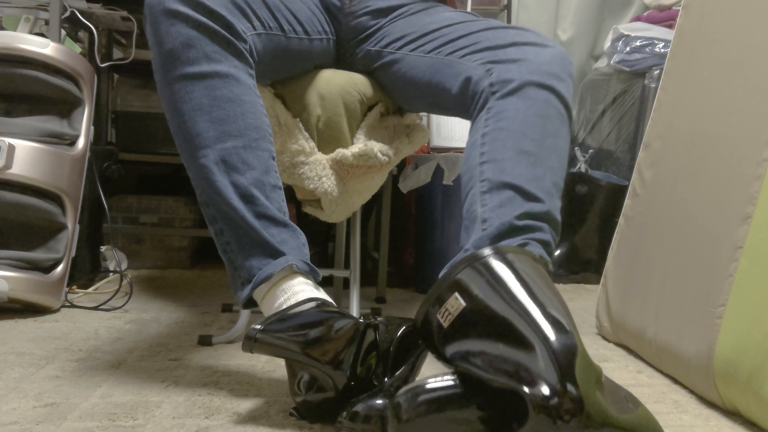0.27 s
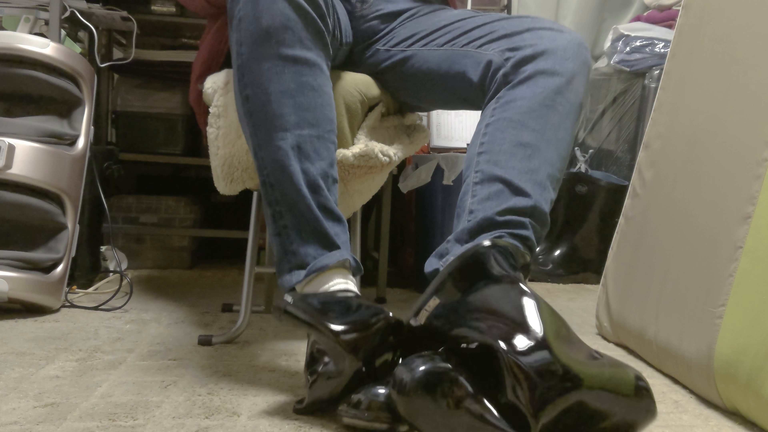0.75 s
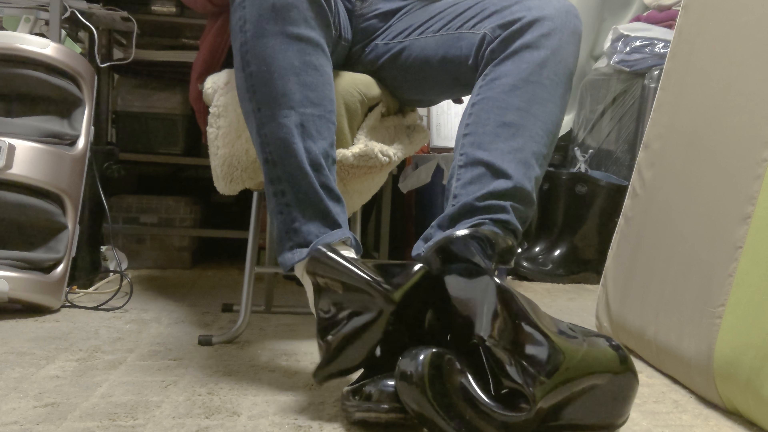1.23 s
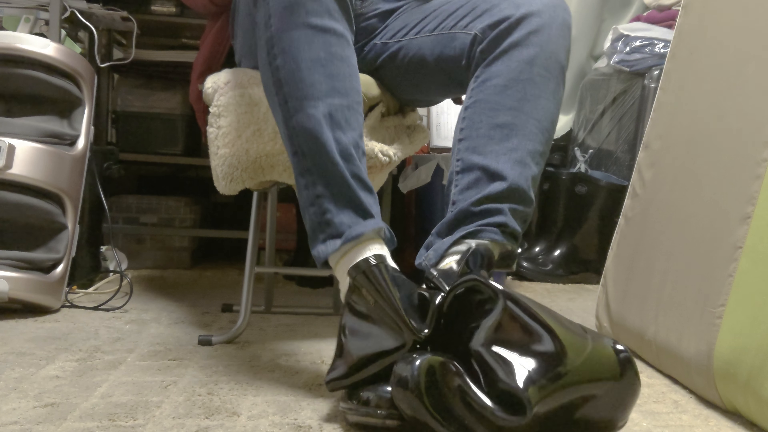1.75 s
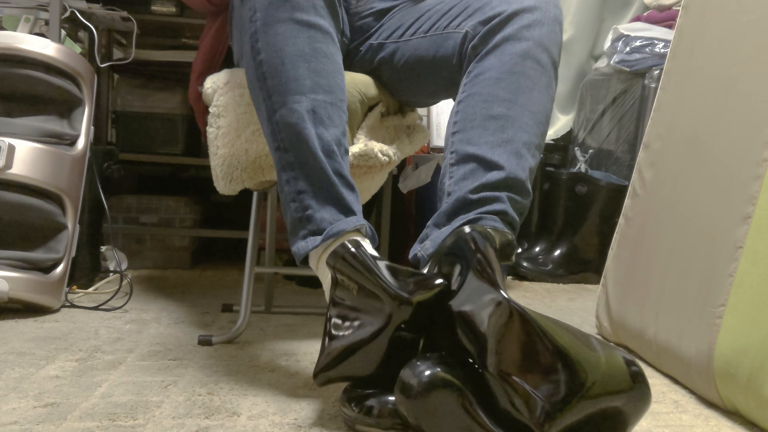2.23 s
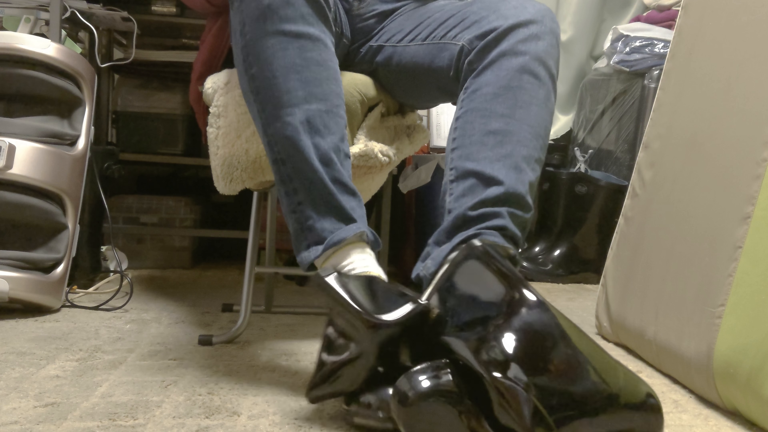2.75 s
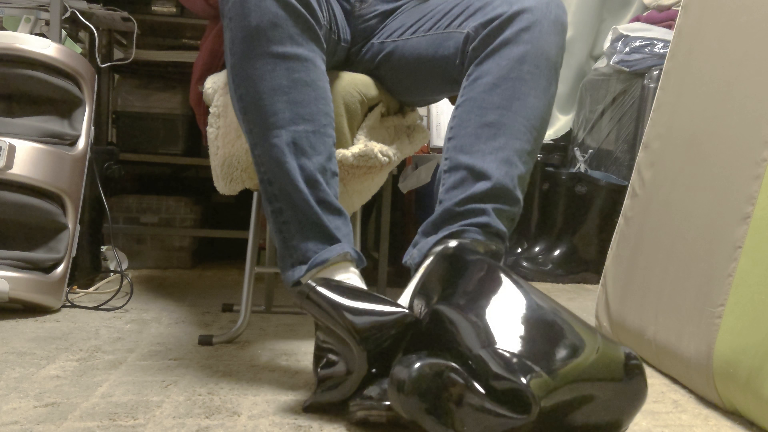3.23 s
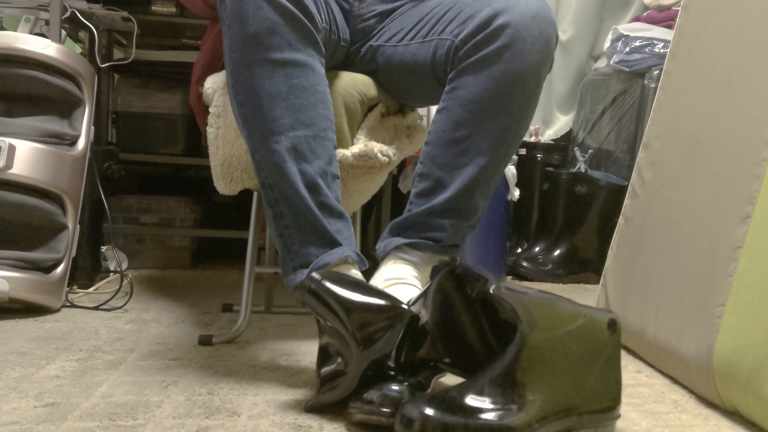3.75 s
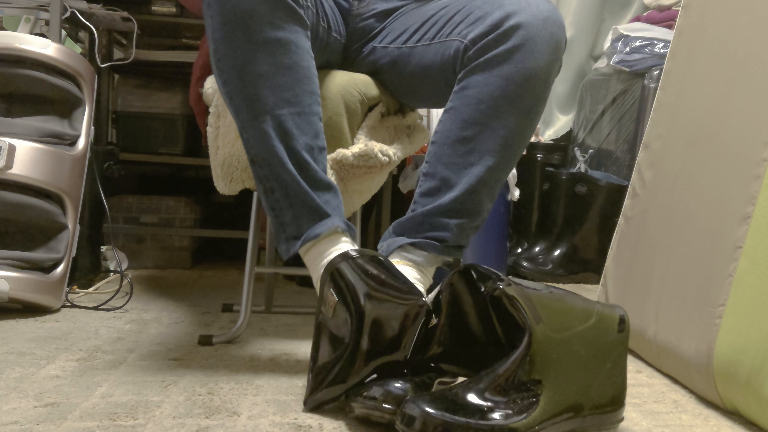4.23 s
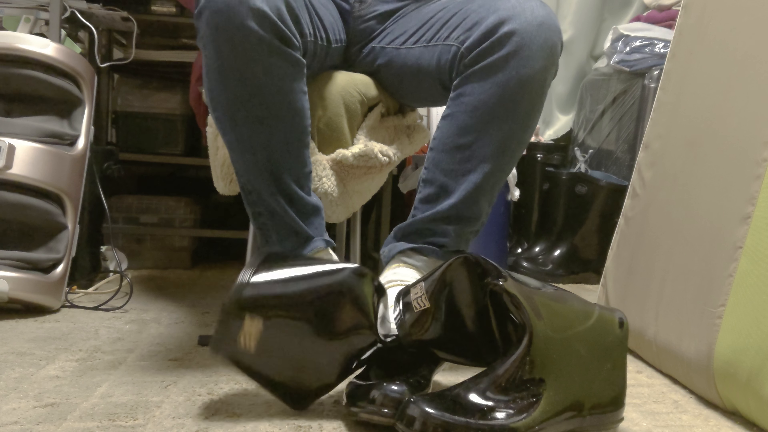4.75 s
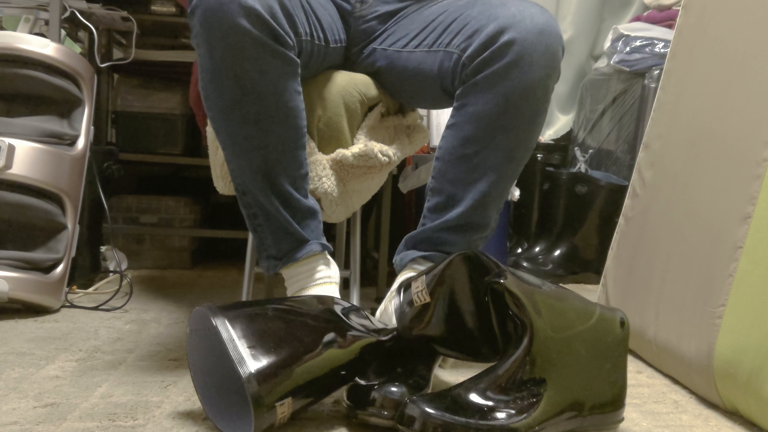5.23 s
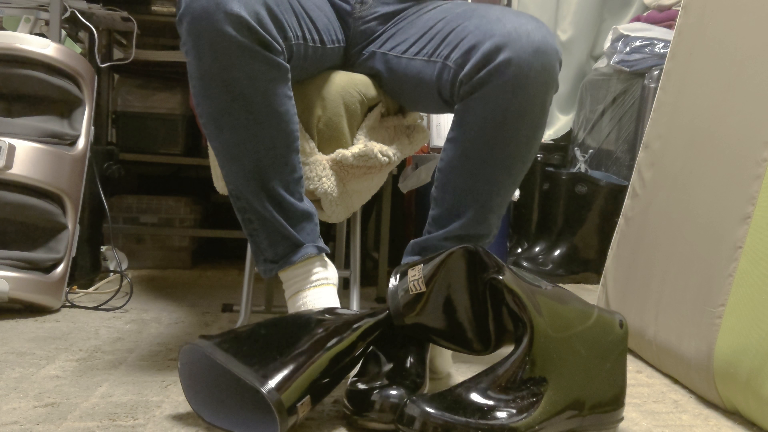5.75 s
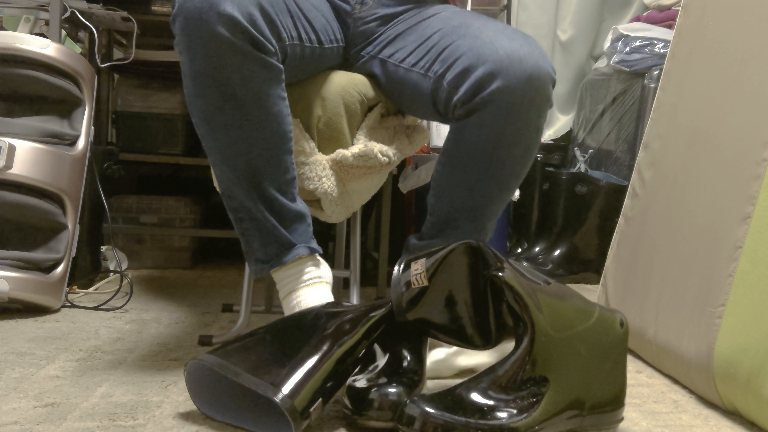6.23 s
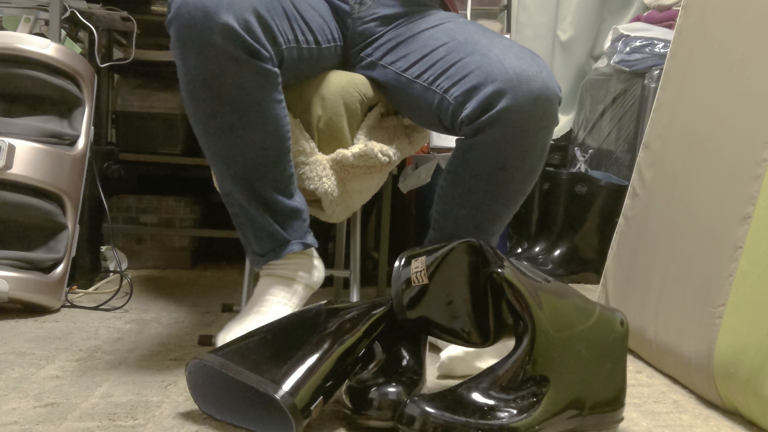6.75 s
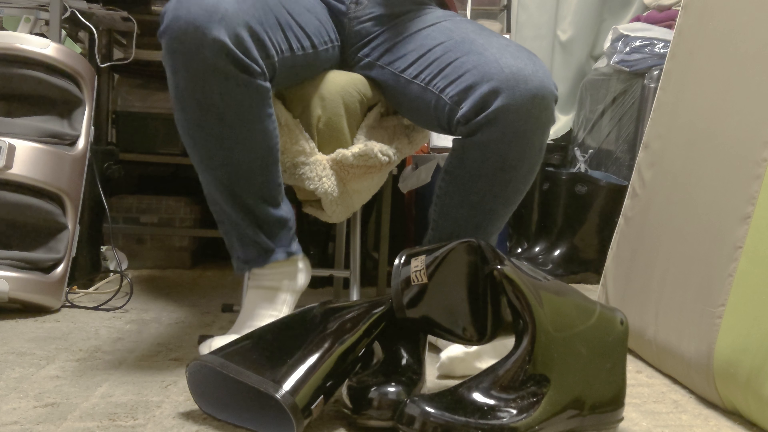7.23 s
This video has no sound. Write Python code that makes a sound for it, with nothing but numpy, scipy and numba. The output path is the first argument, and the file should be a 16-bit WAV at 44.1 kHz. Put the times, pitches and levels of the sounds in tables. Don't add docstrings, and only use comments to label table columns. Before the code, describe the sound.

Close by in a small cluttered room, glossy rubber boots rub together and are pulled off. Brief touches lead to dense hollow slips, rasping and snapping creases, then harder presses with dull creaking heel rubs, then peeling pulls that thin out. Soft heel knocks shake the hard floor. Afterwards only a few faint ticks and thin cloth slides remain over a steady low hum and a slight whir at the left.

```python
import sys
import numpy as np
from scipy import signal
from scipy.fft import rfft, irfft, next_fast_len
from scipy.io import wavfile
from scipy.ndimage import uniform_filter1d
from numba import njit

SR = 44100
rng = np.random.default_rng(int(sys.argv[2]) if len(sys.argv) > 2 else 0)


def nominal_scale(level):
    x = np.asarray(level, float) / 20
    return 10 ** x


def master_out(mix):
    frames = np.transpose(np.atleast_2d(mix))
    ceiling = np.clip(frames, -1, 1)
    pcm = np.round(ceiling * 32767).astype(np.int16)
    wavfile.write(sys.argv[1], SR, pcm)


N = 330309
TIME = np.arange(N) / SR

# frequency_hz, level_db
ROOM_TONE = [(15, -73), (25, -17), (80, -11.5), (102, -1.5), (120, -18), (185, -8), (217, -54),
             (516, -17.5), (677, -74), (962, -24.5), (1190, -23), (5730, -40), (6560, -67), (9840, -49),
             (16000, -59)]
# frequency_hz, side_minus_mid_db
ROOM_WIDTH = [(60, -0.5), (110, -11), (200, -7), (380, 11), (700, -31), (1290, -5), (2380, -0.5),
              (4400, 1.5), (8120, -6), (15000, 13)]
# frequency_hz, level_db
WHIR_SPECTRUM = [(350, -5.5), (560, -3), (700, 6.5), (800, 3.5), (950, -6.5), (1400, -3), (1900, -31.5)]
# pitch_hz, level_db
MOTOR_LINES = [(67, -57), (92.5, -55), (150, -56.5)]
# frequency_hz, level_db
RUMBLE_SPECTRUM = [(15, -33), (25, -4), (54, 4.5), (91, 5), (124, -8), (160, 2), (210, -78)]
# start_s, level_db, pitch_hz, t60_s
HEEL_KNOCKS = [(0.44, -35, 93.5, 0.19), (0.962, -30, 48.7, 0.37), (1.501, -34, 46.4, 0.35),
               (1.15, -26, 63.6, 0.62), (1.457, -41, 160, 0.22), (1.742, -21, 187, 0.034),
               (1.88, -33, 47.4, 0.44), (2.795, -23.5, 170.4, 0.29), (2.914, -21, 67, 0.16),
               (3.595, -16, 160.4, 0.13), (3.849, -23.5, 49.8, 0.73), (4.05, -36, 169, 0.35)]
# start_s, end_s, centre_hz, width_hz, level_db
THIN_SLIDES = [
    (6.14, 6.42, 9900, 800, -71),
    (7.12, 7.5, 9900, 800, -71),
    (3.5, 3.57, 12500, 5000, -49),
    (3.57, 3.64, 12000, 5000, -56),
]
# full_pressure_s, reach_s, rasp_db, scrape_db
STROKES = [(0.024, 0.053, -35, -41), (0.532, 0.033, -26, -64), (0.825, 0.052, -19, -31),
           (.89, 0.086, -29, -32), (0.975, 0.06, -27, -25.5), (1.093, 0.04, -17.5, -35),
           (1.18, 0.98, -25.5, -55), (1.464, 0.047, -17.5, -25.5), (1.66, 0.17, -32.5, -36),
           (1.745, 0.019, -8, -26), (1.877, 0.069, -23, -28.5), (2.001, 0.05, -21, -37),
           (2.051, 0.04, -43, -33.5), (2.401, 0.094, -33, -37), (2.5, 0.13, -27.5, -35),
           (2.675, 0.022, -19, -29), (2.812, 0.18, -17, -32), (2.965, 0.014, -19, -33.5),
           (3.051, 0.032, -16.5, -58), (3.17, 0.39, -30, -54), (3.3, 0.24, -29, -38.5),
           (3.532, 0.13, -22, -30), (3.61, 0.098, -22.5, -38), (3.917, 0.29, -27.5, -46),
           (4.064, 0.022, -18.5, -42), (4.24, 0.21, -27.5, -41.5), (4.3, .1, -28, -41),
           (4.37, 0.066, -26, -47), (4.461, 0.075, -24.5, -41.5), (4.576, 0.029, -25, -42.5)]
# time_s, effort_db
IDLE_EFFORT = [(0, -7), (.4, -5), (.75, 9), (1.3, 18.5), (2.05, 10), (2.15, 5.5), (2.35, 8), (2.8, 0),
               (3.7, 4.5), (4.0, -11), (4.5, 5), (4.7, -17), (5.7, -37)]
# frequency_hz, level_db
RUBBER_SPECTRUM = [(530, -0.5), (900, -2.5), (1060, 0), (1570, -2), (4480, -7.5), (5900, -13), (7000, -24),
                   (9100, -81)]
# start_s, level_db,
# pitch_hz
DRY_TICKS = [(0.802, -25, 3820), (0.844, -18, 3700), (0.883, -17.5, 3700), (0.915, -18.5, 3800),
             (0.958, -18.5, 5450), (0.976, -24, 3860), (0.988, -22, 4000), (0.999, -28, 3800),
             (1.347, -26, 2720), (1.397, -23.5, 2260), (2.013, -26, 3830), (2.817, -20, 4730),
             (2.837, -16.5, 2040), (3.054, -27, 2970),
             (1.122, -40.5, 12300),
    (1.23, -43, 13200),
    (1.742, -35, 12200),
    (1.868, -31.5, 8100),
    (3.411, -47, 12000),
    (3.473, -39, 11700),
    (3.499, -58, 10800),
             (0.02, -48, 2580),
    (0.4409, -33.5, 2820),
    (3.1535, -35, 4400),
    (3.1636, -27, 2900),
    (3.64, -27, 3340),
    (4.2272, -47, 2610),
    (4.6736, -37, 2800),
             (5.401, -49, 11200),
    (5.4859, -50, 11000),
    (6.4148, -51, 11100),
    (6.7812, -55, 14300),
    (6.805, -48, 11100),
    (6.8674, -48, 11000),
    (7.414, -46, 10600),
]
# start_s, level_db, lowest_mode_hz
CREASE_SNAPS = [(.764, -40, 3400), (.7967, -31, 4320), (.8142, -30, 1950), (.8396, -31, 1370),
                (.882, -35, 2750), (.915, -27, 2660), (.9519, -30, 2300), (1.0891, -22, 3030),
                (1.096, -23, 3250), (1.117, -23, 3600), (1.2662, -28, 2770), (1.2906, -37, 4300),
                (1.4143, -27, 2190), (1.4238, -24, 2020), (2.284, -27.5, 2940), (2.351, -34.5, 3120),
                (2.381, -35, 2120), (2.404, -29.5, 2100), (2.422, -31, 2950), (2.486, -29, 2110),
                (2.708, -28, 4260), (2.779, -33, 2000), (2.789, -32, 3940), (2.853, -24, 1860),
                (2.893, -23, 2000), (3.085, -29, 1960), (3.288, -33, 1480), (3.3, -30, 1840),
                (3.4552, -46, 2150), (3.6992, -32, 3860), (3.785, -36.5, 1930), (3.8872, -38, 2280),
                (3.981, -45, 2030), (4.1657, -44, 2050), (4.1777, -32.5, 1940), (4.1981, -33, 2000),
                (4.231, -43, 5240), (4.248, -36, 5340), (4.269, -42, 5300), (4.2739, -27, 1640),
                (4.285, -42, 5430), (4.2964, -28, 1730), (4.4665, -51, 2570), (6.8058, -41, 5800),
                (7.043, -46, 3020), (7.2078, -27.5, 3100), (7.2146, -35, 3100), (.0205, -27.5, 1400),
                (.043, -45, 2900), (.786, -37, 3860), (.821, -29, 3930), (.873, -28, 3860),
                (.9424, -22, 3440), (.97, -24, 4640), (1.008, -23.5, 3620), (1.1555, -16, 2700),
                (1.187, -21.5, 2750), (1.2295, -15, 2670), (1.695, -39, 1610), (1.821, -37, 1510)]
# start_s, level_db, lowest_mode_hz
HIGH_CREASE_SNAPS = [
    (3.311, -57, 11500),
    (3.346, -46, 11000),
    (3.4113, -48, 10000),
    (3.499, -37, 10300),
    (3.594, -38, 10400),
    (3.608, -51, 10600),
    (3.6795, -52, 9300),
    (3.856, -45, 10100),
    (3.9187, -49, 10500),
]
# frequency_ratio, level_db
CREASE_MODES = [(1, 4.5), (1.22, -6), (1.5, -16), (1.85, -20.5)]
# start_s, level_db, pitch_hz
SKIN_CHIRPS = [(.441, -51, 10500), (1.0667, -30, 3500), (1.101, -28, 3200), (1.232, -28, 4400),
               (1.267, -39, 4400), (1.324, -35, 4400), (2.8178, -16.5, 4670), (2.8185, -23.5, 5730),
               (4.23, -37, 5500), (4.2825, -36, 5540), (6.781, -48, 14500), (6.806, -42.5, 4900)]
# start_s, end_s, pitch_hz, level_db
FOLD_CREAKS = [(4.225, 4.30, 1750, -43), (4.32, 4.37, 1850, -49), (4.22, 4.27, 3600, -48),
               (4.29, 4.40, 4100, -46), (4.36, 4.40, 3900, -47), (4.35, 4.40, 5250, -50),
               (4.56, 4.605, 1050, -44), (1.9, 1.95, 490, -30), (2.03, 2.062, 490, -37),
               (2.045, 2.065, 3150, -46), (3.495, 3.555, 2230, -39), (3.495, 3.53, 1660, -39),
               (3.5, 3.585, 400, -31), (3.5, 3.59, 1080, -38)]
# start_s, level_db,
# pitch_hz
HEEL_RUBS = [(3.016, -28, 446), (3.028, -22, 720), (3.053, -27, 580), (3.072, -19, 640), (3.088, -30, 603),
             (3.105, -21.5, 670), (3.127, -27, 650), (3.143, -24.5, 604), (3.169, -28, 520),
             (3.193, -25.5, 517), (3.213, -25, 484), (3.234, -21, 526), (3.25, -31, 573), (3.267, -31, 490),
             (3.286, -26, 570), (0.9704, -17, 430), (3.393, -35, 470), (2.469, -40, 550), (2.509, -27, 530),
             (2.52, -33, 530), (2.603, -31, 1100), (2.64, -27, 1020), (2.656, -19, 1080),
             (2.746, -15.5, 1080), (2.773, -36, 700), (2.818, -21, 1000), (2.861, -20.5, 800),
             (2.889, -19, 964), (2.897, -20, 945), (2.96, -19.5, 720), (2.978, -22, 775), (4.382, -36, 700),
             (4.583, -52, 1060), (0.558, -35, 1090), (.786, -28.5, 453), (.801, -31, 487), (.838, -20, 537),
             (.862, -23, 590), (1.647, -23.5, 840), (1.67, -29, 800), (1.683, -44, 700), (1.711, -29, 704),
             (1.733, -24, 800), (1.739, -22, 860), (1.834, -37, 1100), (1.854, -23.5, 895),
             (1.97, -31, 1010), (2.05, -27, 1010), (3.474, -20.5, 696), (3.608, -18.5, 302),
             (4.2961, -29, 715), (1.0673, -13, 620), (1.09, -13.5, 720), (1.123, -17, 540),
             (1.133, -15, 477), (1.112, -15, 483)]
# start_s, level_db, shaft_pitch_hz,
# crack_re_ring_db
BOOT_SLIPS = [(0.458, -22.5, 1040, -31), (0.497, -27.5, 637, 1), (0.529, -26.5, 247, -3),
              (0.837, -20, 500, -2), (0.881, -21.5, 367, 3), (0.943, -9, 281, -9), (0.961, -12, 260, -35),
              (0.9825, -8, 264, -12), (1.035, -20, 450, -5), (1.067, -11, 300, -17), (1.09, -14, 675, -12),
              (1.101, -11.5, 488, -5), (1.122, -13.5, 298, -1), (1.156, -11.5, 310, 2),
              (1.187, -15.5, 310, 3), (1.23, -10, 271, -1), (1.267, -19, 302, -5), (1.291, -22, 260, 3),
              (1.324, -20.5, 297, 1), (1.377, -20, 312, 0.5), (1.428, -15.5, 260, -6),
              (1.464, -10.5, 251, -13), (1.539, -19.5, 364, -2.5), (1.581, -24.5, 476, 2),
              (1.647, -16.5, 645, -10), (1.655, -15.5, 323, -9),
              (1.7455, -7, 481, -20), (1.8675, -8, 443, -19), (1.877, -4, 472, -42),
               (1.902, -20, 484, -29), (1.9255, -6, 478, -15.5), (1.987, -14.5, 485, -20),
               (2.01, -19.5, 545, -20), (2.419, -22.5, 266, -8), (2.494, -19, 315, -8),
               (2.547, -14, 394, -8), (2.628, -20.5, 664, -9), (2.663, -6.5, 284, -8.5),
               (2.679, -5.5, 930, -20), (2.714, -13.5, 447, -13), (2.737, -11.5, 480, -14),
               (2.757, -17, 426, -18), (2.789, -11.5, 1003, -37), (2.799, -9, 289, -13),
               (2.885, -12, 432, -26), (2.95, -14, 459, -7),
              (3.037, -30, 640, 1), (3.0663, -24, 660, -14), (3.3158, -16, 663, -17),
              (3.345, -19, 405, -12), (3.412, -14, 373, -26), (3.474, -15, 370, -29),
              (3.513, -18.5, 402, -18), (3.554, -15.5, 520, -6), (3.578, -18.5, 296, -9),
              (3.592, -10.5, 430, -30), (3.598, -21, 294, -34), (3.92, -26, 400, 0.5),
              (4.058, -28.5, 260, -2), (4.237, -31, 395, -5), (4.294, -23, 498, -18),
              (4.435, -20.5, 577, -35), (4.468, -23.5, 770, -24),
              (0.019, -28.5, 210, -6.5), (0.652, -26.5, 317, -27), (2.169, -29, 650, -8),
              (2.335, -30, 247, 1.5), (2.395, -25, 215, -25), (2.857, -11, 405, -15),
              (3.497, -17, 383, -31), (3.71, -25.5, 393, -4.5), (3.857, -24.5, 530, -7),
              (4.223, -23.5, 977, -28), (4.277, -21.5, 270, -23), (5.074, -27.5, 204, -22),
              (5.275, -26, 374, -17), (5.514, -30, 407, -31)]
# start_s, period_s, level_db, shaft_pitch_hz, crack_re_ring_db
CHATTER = (3.5, .023, -18.5, 488, -23)
# frequency_hz, level_db
MIC_RESPONSE = [(20, -38), (40, 5), (5500, 0), (6800, -4), (7550, -15), (8400, 2), (9050, -5), (9700, 8.5)]
# frequency_hz, level_db
TOP_CUT = [(15870, 0), (15990, -70)]

ROOM_DB, WHIR_DB = -44.5, -47
HUM_HZ, HUM_WIDTH_HZ, HUM_DB = 185, 14, -47.5
ECHO_T60_S, ECHO_DB = .09, -9
REST_S = 5.69
RASP_FALL_DB, SCRAPE_FALL_DB, RISE_SHARE = 18, 17, 0.85
IDLE_RASP_DB, IDLE_SCRAPE_DB, IDLE_RASP_SLOPE, IDLE_SCRAPE_SLOPE = -43, -52.5, 0.25, 0.8
HISS_DB, HISS_SLOPE = -60.5, 0.78
SHAKE_DB, SHAKE_SLOPE, SHAKE_S = -42, 0.2, 0.11


def level(x, db):
    return x * nominal_scale(db) / np.sqrt(np.mean(x ** 2))


def colour(x, table):
    hz, db = np.transpose(table)
    size = next_fast_len(N)
    log_hz = np.log(np.fft.rfftfreq(size, 1 / SR) + 1)
    gain = nominal_scale(np.interp(log_hz, np.log(hz), db))
    return irfft(rfft(x, size) * gain, size)[..., :N]


def walk(rate_hz):
    k = int(SR / rate_hz)
    steps = np.repeat(rng.standard_normal(N // k + 1), k)
    return 1.264 * uniform_filter1d(uniform_filter1d(steps, k), k)[:N]


@njit
def rings(rows, sweep, sweep_s, rise):
    out = np.zeros((2, N))
    sweep_fall = np.exp(-1 / (sweep_s * SR))
    for s, hz, t60, left, right, phase, lag in rows:
        start, extra = int(s * SR), sweep
        z, turn = np.exp(1j * phase), np.exp(1j * lag)
        fade = np.exp(-np.log(1000) / (t60 * SR))
        for i in range(start, min(N, start + int(t60 * SR))):
            onset = min((i - start + 1) * hz / (rise * SR), 1.)
            out[0, i] += left * onset * z.imag
            out[1, i] += right * onset * (z * turn).imag
            z *= fade * np.exp(2j * np.pi * min(hz * (1 + extra) / SR, .45))
            extra *= sweep_fall
    return out


def ring(s, hz, t60, db, sweep=0., sweep_s=0.00015, rise=0.14, spread_s=0.00012, lead_s=.00005,
         pan_db=0.5, struck=False):
    chance = rng.random((len(s), 3)).T
    lag = 2 * np.pi * hz * (lead_s + spread_s * (2 * chance[1] - 1))
    side_db = .4 + pan_db * (2 * chance[2] - 1)
    phase = 2 * np.pi * chance[0] * (not struck)
    t60 = np.clip(t60, .002, .4)
    columns = np.broadcast_arrays(s, hz, t60, nominal_scale(db + side_db), nominal_scale(db - side_db), phase, lag)
    return rings(np.stack(columns, axis=1), 1. * sweep, 1. * sweep_s, 1. * rise)


def bursts(s, db, decay_s):
    clicks = np.zeros(N)
    np.add.at(clicks, (s * SR).astype(int), nominal_scale(db))
    decay = signal.lfilter([1], [1, -np.exp(-1 / (decay_s * SR))], clicks)
    return uniform_filter1d(decay, size=24)


def skin(gate):
    mid, side = rng.standard_normal((2, N))
    ports = np.array([mid + 0.74 * side, mid - 0.6 * side])
    return level(colour(ports, RUBBER_SPECTRUM), 0) * gate


def room():
    mid, side, hum, whir = rng.standard_normal((4, N))
    side = colour(side, ROOM_WIDTH)
    tone = level(colour(np.array([mid + side, mid - side]), ROOM_TONE), ROOM_DB - 9.5)
    hum = signal.lfilter(*signal.iirpeak(HUM_HZ, HUM_HZ / HUM_WIDTH_HZ, fs=SR), hum)
    hum_line = np.sin(2 * np.pi * np.cumsum(HUM_HZ + 1.568 * walk(4)) / SR)
    hum = level(hum, HUM_DB - 11.0) + nominal_scale(HUM_DB) * hum_line
    whir = level(colour(whir, WHIR_SPECTRUM), WHIR_DB) * nominal_scale(.8 * walk(9))
    return tone + hum * nominal_scale([[1.5], [-1.5]]) + whir * np.array([[1], [.08]])


def motor():
    out = 0
    for hz, db in MOTOR_LINES:
        line = np.sin(2 * np.pi * np.cumsum(hz + 2 * walk(4)) / SR)
        out = out + nominal_scale(db + 2.9 * walk(5.5)) * line
    return out * nominal_scale([[1], [-1]])


def echo(x, count=5000):
    tail = rng.standard_normal((2, count)) * nominal_scale(-60 * np.arange(count) / SR / ECHO_T60_S)
    tail[:, :90] = 0
    tail /= np.sqrt(np.sum(tail ** 2, axis=1, keepdims=True))
    wet = signal.fftconvolve(x.mean(axis=0, keepdims=True), tail, axes=1)[:, :N]
    return nominal_scale(ECHO_DB) * colour(wet, [(200, -108), (700, 4.0), (1500, 3.5), (8000, 2)])


def rumble(db):
    mid, side = rng.standard_normal((2, N)) * nominal_scale(2.8 * walk(20))
    ports = np.array([1.2 * mid + .08 * side, mid - .08 * side])
    return level(colour(ports, RUMBLE_SPECTRUM), 0) * nominal_scale(db)


def knocks():
    s, db, hz, t60 = np.transpose(HEEL_KNOCKS)
    out = ring(s, hz, t60, db, .3, .01, .55, pan_db=.3)
    return out + ring(s, 1.45 * hz, .7 * t60, db - 7, .3, .01, .55, pan_db=.3)


def slides():
    out = 0
    for start, end, hz, width, db in THIN_SLIDES:
        gate = uniform_filter1d(1. * (TIME > start) * (TIME < end), size=1500)
        band = signal.iirpeak(hz, hz / width, fs=SR)
        out = out + level(signal.lfilter(*band, rng.standard_normal((2, N))), db) * gate
    return out


def pressure(stroke_db, fall_db, idle_db):
    s, reach = np.transpose(STROKES)[:2, :, None]
    t = TIME[::128]
    away = np.maximum((t - s) / reach, (s - t) / (RISE_SHARE * reach))
    power = np.sum(nominal_scale(stroke_db[:, None] - fall_db * away) ** 2, axis=0) + nominal_scale(idle_db[::128]) ** 2
    return np.interp(TIME, t, 10 * np.log10(power))


def scrape(db, hiss_db, count=4500):
    c = rng.random((count, 3)).T
    s = c[0] * REST_S
    size_db = np.minimum(-4.0 * np.log(c[1] + 1e-9), 13)
    gate = bursts(s, size_db, 0.0012)
    gate = 0.38 + gate / np.sqrt(np.mean(gate ** 2))
    high = rng.standard_normal((2, N)) * gate
    high = colour(high, [(6000, -48), (8000, 5.5), (10000, 8.5), (16000, 1.5)])
    crease_db = db[(s * SR).astype(int)] + size_db - 15.0 - 9 * c[2]
    creases = ring(s, 1300 * 7.0 ** c[2], 0.022, crease_db)
    return skin(gate * nominal_scale(db - 6.5)) + creases + level(high, 0) * nominal_scale(hiss_db)


def rasp(db, ring_hz, count=3500):
    c, g = rng.random((count, 3)).T, rng.standard_normal(count)
    s = c[0] * REST_S
    at = (s * SR).astype(int)
    size_db = np.minimum(-3.0 * np.log(c[1] + 1e-9), 9)
    tuned = c[2] < .3
    held_hz = ring_hz[at // 2048 * 2048]
    hz = np.where(tuned, held_hz * 2 ** (0.1 * g), 600 * 2 ** (0.73 * g))
    hz = np.clip(hz, 150, 2200)
    t60 = np.where(tuned, .045, 7 / hz)
    return ring(s, hz, t60, db[at] + size_db - np.where(tuned, 12., 8.), 0.14)


def ticks():
    s, db, hz = np.transpose(DRY_TICKS)
    c, late = rng.standard_normal((len(s), 5)).T, rng.random((len(s), 5)).T
    t60 = .0032 * (4000 / hz) ** .3
    puff = skin(bursts(s, db - np.where(hz < 7000, 2., 30.), 0.0032))
    out = colour(puff, [(1500, -12.0), (2800, -24.0), (5500, -12.0)])
    for k in range(5):
        mode_hz = hz * 2 ** (0.11 * k * c[k] - 0.0076 * k)
        out = out + ring(s + 0.00078 * k * late[k], mode_hz, t60, db + 5 - 1.05 * k, rise=1.03)
    return out


def snaps():
    s, db, hz = np.transpose([*CREASE_SNAPS, *HIGH_CREASE_SNAPS])
    c = rng.random((len(s), 8)).T
    t60 = 0.0095 * (2000 / hz) ** 0.28
    out = 0
    for k, (ratio, mode_db) in enumerate(CREASE_MODES):
        mode_hz = np.minimum(hz * ratio * (0.967 + 0.085 * c[k]), 15500)
        out = out + ring(s + .001 * c[k + 4], mode_hz, t60, db + mode_db, 0.13, 0.00035, 0.91)
    return out


def chirps(count=3):
    s, db, hz = np.repeat(np.transpose(SKIN_CHIRPS), count, axis=1)
    c = rng.random((len(s), 2)).T
    late = .002 * (np.arange(len(s)) % count) * c[0]
    x = ring(s + late, hz * (.97 + .06 * c[1]), .008, db, rise=1.)
    return x + echo(x)


def creaks(count=14):
    start, end, hz, db = np.repeat(np.transpose(FOLD_CREAKS), count, axis=1)
    c = rng.random((len(hz), 3)).T
    s = start + (end - start) * (np.arange(len(hz)) % count + c[0]) / count
    return ring(s, hz * (.98 + .04 * c[1]), 1 / np.sqrt(hz), db + 8 * c[2])


def rubs():
    s, db, hz = np.transpose(HEEL_RUBS)
    c = rng.random(len(s))
    out = ring(s, hz, 16 / hz, db, 0.51, 0.00061, 0.64, struck=True)
    out += ring(s, hz * (1.42 + 0.22 * c), 12 / hz, db - 11, 0.56, 0.00078, 0.3)
    out += ring(s + 0.0011, 0.55 * hz, 9 / hz, db + 0.5, 0.41, 0.00095, 0.19)
    return out + skin(bursts(s, db - 17.5, 0.0044))


def all_slips():
    start, period, *rest = CHATTER
    run = [(start + k * period, *rest) for k in range(5)]
    events = [*BOOT_SLIPS, *run]
    return np.transpose(sorted(map(tuple, events)))


def returns(count=5):
    s, db, _, crack_db = np.repeat(all_slips(), count, axis=1)
    c = rng.random((len(s), 2)).T
    late = 0.001984 + 0.018 * (np.arange(len(s)) % count + c[0]) / count
    late_db = db + crack_db - 7.0 - 600 * late
    return ring(s + late, 500 + 900 * c[1], 0.016, late_db, 2.28, 0.00108, 1.0)


def slips():
    s, db, hz, crack_db = all_slips()
    c = rng.random((len(s), 5)).T
    t60 = .06 * np.minimum(450 / hz, 1.1) ** .9
    out = ring(s, hz, t60, db - 6.5, 0.61, 0.0014, 0.35, struck=True)
    out += ring(s, hz * (.6 + .25 * c[0]), .55 * t60, db - 9, .4, .0015, .4, struck=True)
    out += ring(s, hz * (1.288 + 0.91 * c[1]), 0.5 * t60, db - 9.5, 0.12, 0.0056, 0.15)
    out += ring(s + 0.00432 * c[4], 750 + 1100 * c[3], 0.016, db + .5 * crack_db - 9.0, 1.0)
    out += ring(s - .0001, 300 + 160 * c[2], 0.013, db + crack_db + 6, 10.11, 0.000884, 0.65)
    return out + skin(bursts(s, db + crack_db - 20, 0.018))


def scene():
    effort = np.interp(TIME, *np.transpose(IDLE_EFFORT))
    _, _, stroke_rasp_db, stroke_scrape_db = np.transpose(STROKES)
    rasp_db = pressure(stroke_rasp_db, RASP_FALL_DB, IDLE_RASP_DB + IDLE_RASP_SLOPE * effort)
    scrape_db = pressure(stroke_scrape_db, SCRAPE_FALL_DB, IDLE_SCRAPE_DB + IDLE_SCRAPE_SLOPE * effort)
    hiss_db = HISS_DB + HISS_SLOPE * (scrape_db + 38.5)
    slow_scrape_db = uniform_filter1d(scrape_db, int(SHAKE_S * SR))
    shake_db = SHAKE_DB + SHAKE_SLOPE * (slow_scrape_db + 41.5)
    s, _, hz, _ = all_slips()
    ring_hz = np.interp(TIME, s, hz)
    rest = np.clip((REST_S - TIME) / 0.13, 0, 1)
    background = room() + motor()
    floor = knocks() + rest * rumble(shake_db - 6.5)
    boots = rest * scrape(scrape_db, hiss_db) + rasp(rasp_db, ring_hz)
    boots = boots + ticks() + snaps() + creaks() + rubs() + returns() + slips()
    return background + floor + slides() + chirps() + boots + echo(boots)


def band_limit(x):
    return signal.sosfilt(signal.butter(12, 16000, fs=SR, output="sos"), x)


def record(dry):
    soft = .6 * np.tanh(dry / .6)
    mix = colour(colour(soft, MIC_RESPONSE), TOP_CUT)
    return band_limit(mix)


dry = scene()
out = record(dry)
master_out(out)
```